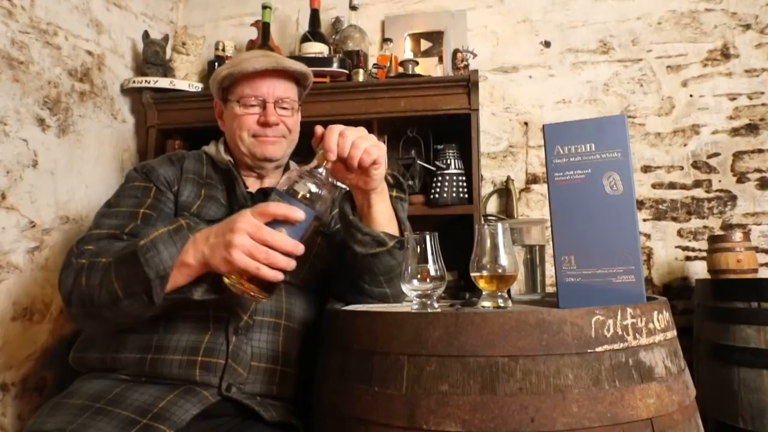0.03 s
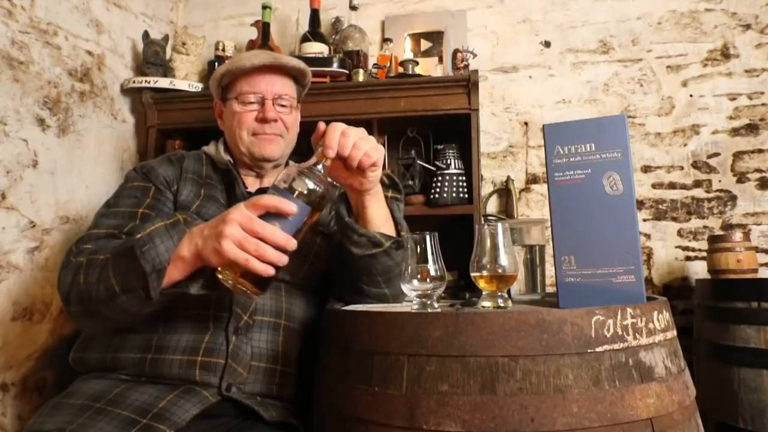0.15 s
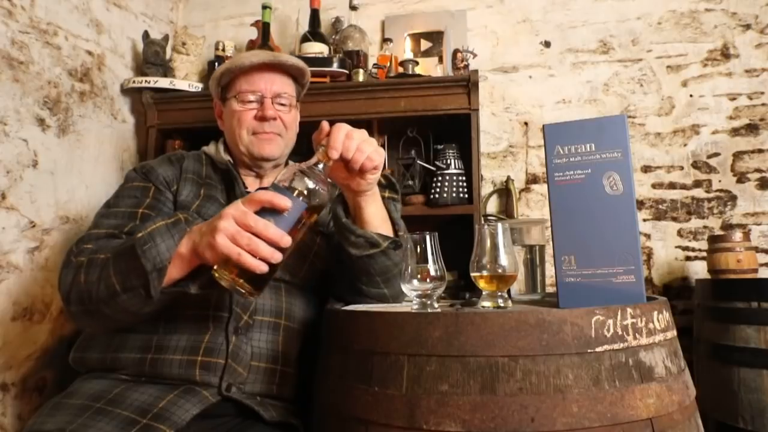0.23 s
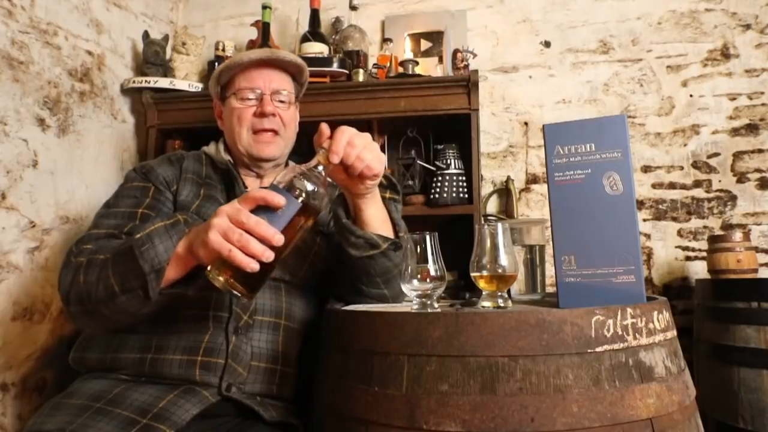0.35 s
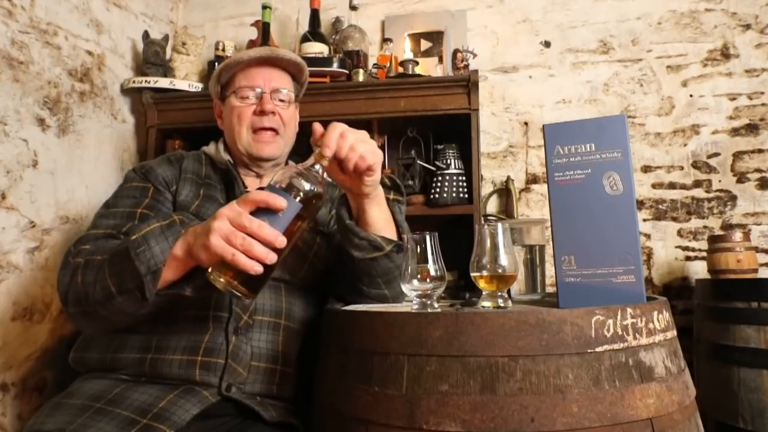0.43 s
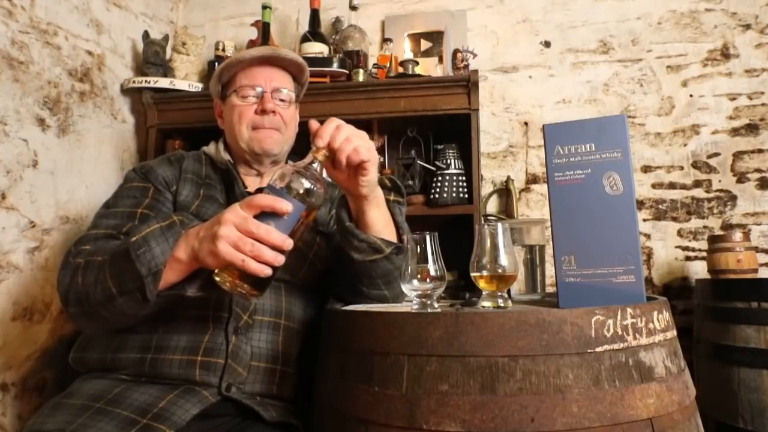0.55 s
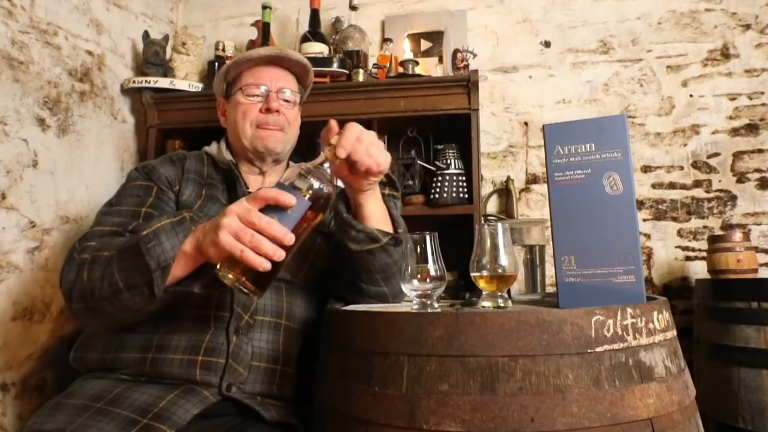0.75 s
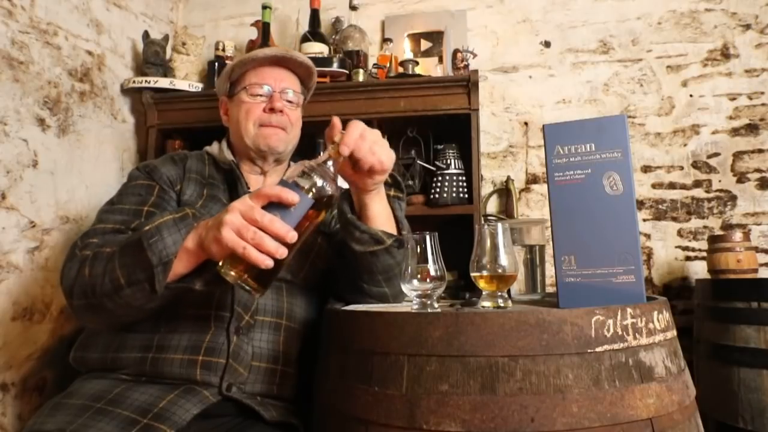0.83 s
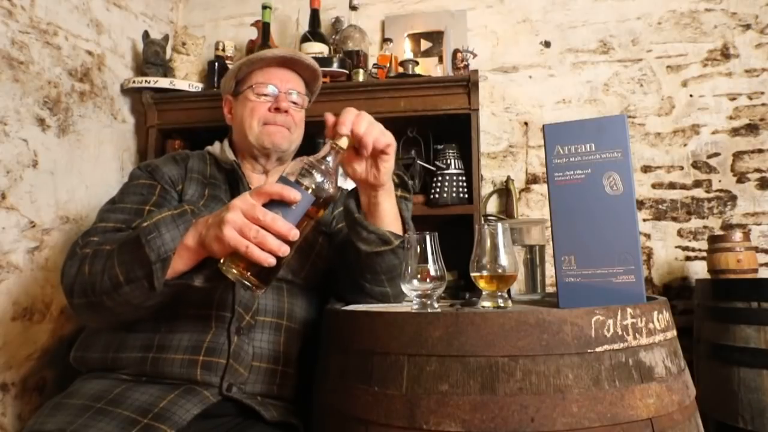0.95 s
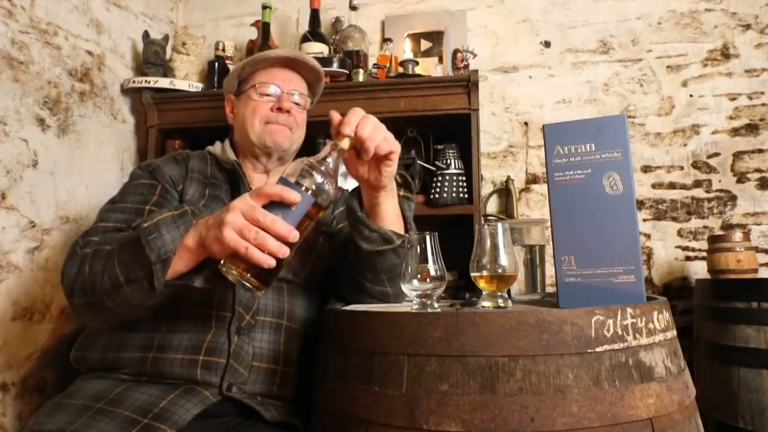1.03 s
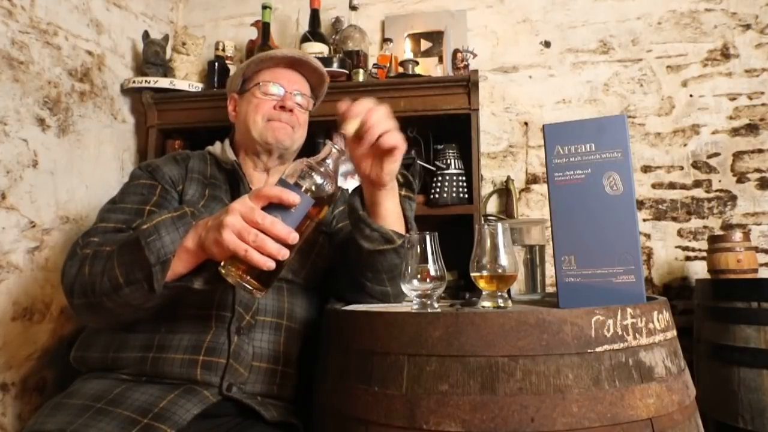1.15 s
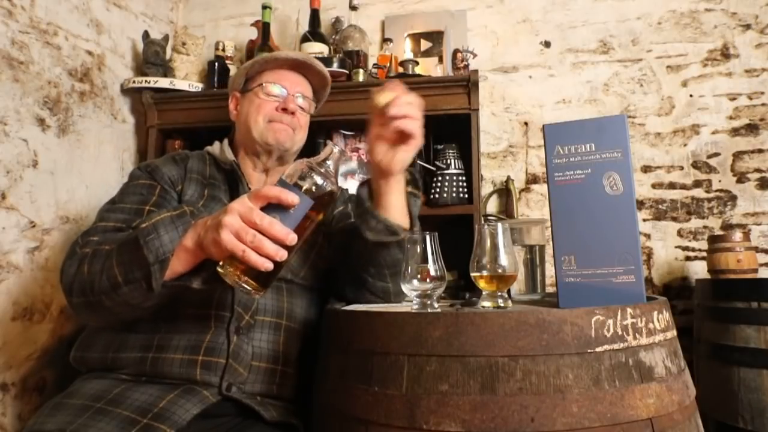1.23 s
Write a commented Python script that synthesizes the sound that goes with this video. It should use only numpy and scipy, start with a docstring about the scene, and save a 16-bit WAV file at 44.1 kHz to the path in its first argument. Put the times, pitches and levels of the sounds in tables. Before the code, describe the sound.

Close microphone in a small, lightly echoing room: dry rubbing squeaks of a cork twisted in glass, each slowing or breaking into creaks and clicks, then a rising squeal as it comes free with a soft pop.

```python
"""Squeaks and creaks of a cork twisted out of a glass bottle in four short turns, then a faint pop.
The cork sticks and slips on the glass: each slip is a kick; fast slips squeal, slow ones creak.
The last turn shoots up in pitch, the cork comes free and the air in the neck rings and puffs.
The fading tail of an earlier squeak, with a faint rub in it, is heard first, as coloured noise.
Lone snaps, the echo of a small stone room, soft noise and a low hum are added."""
import sys
import numpy as np
from scipy import signal
from scipy.fft import rfft, irfft
from scipy.io import wavfile

SR = 44100
rng = np.random.default_rng(int(sys.argv[2]) if len(sys.argv) > 2 else 0)


def master(y):
    """Save y as 16-bit WAV."""
    cut = np.clip(np.atleast_2d(y).T, -1, 1)
    pcm = np.round(cut * 32767)  # scale
    wavfile.write(sys.argv[1], SR, pcm.astype(np.int16))


N = 57330
T = np.arange(N) / SR   # time of each sample, s
SIZE = 2 ** 17   # samples in each Fourier transform
HZ = np.arange(SIZE // 2 + 1) * SR / SIZE   # frequency of each Fourier bin

# When the cork shifts its seat in each of the first three turns: (t/s)
SHIFT_TIMES = [0.234, 0.5, 0.746]


def from_db(db):
    """Turn decibels into a gain."""
    return 10 ** (np.asarray(db) / 20)


def rms_one(x):
    """Scale a sound to unit power."""
    return x / np.sqrt(np.mean(x ** 2) + 1e-20)


def at_hz(points, hz):
    """Read a table at any frequency, along a logarithmic frequency axis."""
    f, v = np.transpose(points)
    return np.interp(np.log(np.maximum(hz, 1)), np.log(f), v)


def colour(x, spectrum):
    """Filter with the given spectrum, never sounding ahead of its input (minimum phase)."""
    cepstrum = irfft(np.log(from_db(at_hz(spectrum, HZ))))
    # Folding the second half onto the first makes the filter minimum-phase.
    cepstrum[1:SIZE // 2] *= 2
    cepstrum[SIZE // 2 + 1:] = 0
    response = np.exp(rfft(cepstrum))
    return irfft(rfft(x, SIZE) * response)[:N]


def clicks(times, sizes):
    """Make very short impulses, placed between samples by windowed sinc curves."""
    out, taps = np.zeros(N), np.arange(-8, 9)
    at = np.asarray(times)[:, None] * SR
    index = at.astype(int) + taps
    offset = index - at
    shape = np.sinc(offset) * np.sinc(offset / len(taps) * 2)
    np.add.at(out, np.clip(index, 0, N - 1), np.asarray(sizes)[:, None] * shape)
    return out


def earlier_tail():
    """The fading tail of an earlier squeak, with a faint rub in it, made of coloured noise."""
    # Loudness of the tail, with the rub as a small rise: (t/s, level/dB)
    loudness = [(0, -41.5), (.035, -50), (.075, -46.5), (0.112, -55), (.2, -53.5)]
    # Tone of the tail: (f/Hz, level/dB)
    tail_spectrum = [(1200, -0.5), (2100, 7.5), (3350, 2.5), (4200, -3), (8000, -19.5)]
    s, db = np.transpose(loudness)
    fade = np.exp(-np.maximum(T - s[-1], 0) / 0.1)
    noise = rms_one(colour(rng.standard_normal(N), tail_spectrum))
    return from_db(np.interp(T, s, db)) * fade * noise


def background():
    """Room tone, a wavering low hum and a trace of noise that differs between the two sides."""
    # Spectrum shape of the room tone: (f/Hz, level/dB per Hz)
    floor_spectrum = [(50, -24), (85, 1), (130, -4.5), (400, -4.5), (1600, -15.5), (3000, -15),
                      (5000, -24.5), (16000, -27.5)]
    # The hum wavers: (t/s, level/dB)
    hum_level = [(0, -59), (.12, -54.5), (.2, -65), (.98, -68), (1.1, -58.5), (1.3, -62)]
    hum_hz = 47.6
    floor_db, side_hiss_db, side_tone_db = -53, -64.5, -75
    hum_gain = from_db(np.interp(T, *np.transpose(hum_level)))
    hum = hum_gain * np.sqrt(2) * np.sin(2 * np.pi * hum_hz * T)
    tone, other = (rms_one(colour(white, floor_spectrum)) for white in rng.standard_normal((2, N)))
    bright_hiss = rms_one(np.diff(rng.standard_normal(N + 1)))
    side = from_db(side_hiss_db) * bright_hiss + from_db(side_tone_db) * other
    # The side noise has opposite signs in the two channels.
    return from_db(floor_db) * tone + hum + side * np.array([[1], [-1]])


def smear(x):
    """Cork and glass answer each kick with a short ring (all-pass), and radiate little bass."""
    # Bands that the neck holds back a little: (f/Hz)
    lag_hz = [1920, 3700, 5110, 6700]
    lag_width_hz, low_cut_hz = 470, 270
    r = np.exp(-np.pi * lag_width_hz / SR)
    for hz in lag_hz:
        a = [1, -2 * r * np.cos(2 * np.pi * hz / SR), r * r]
        x = signal.lfilter(a[::-1], a, x + 1e-18)
    return signal.sosfilt(signal.butter(2, low_cut_hz, "high", fs=SR, output="sos"), x)


def snaps():
    """Lone slips of the cork: a kick and a brief crumble of noise into the cork."""
    # Single snaps: (t/s, peak level/dB, dullness 0-1)
    snap_list = [(0.202, -36, 0.3), (0.3885, -26.5, 0), (0.3919, -16.5, 0.13), (0.413, -23, 0.8),
                 (0.8191, -13, 0.53), (.9368, -11.5, 0.33)]
    # What the snaps ring with: (f/Hz, level/dB)
    snap_spectrum = [(900, -27.5), (2000, -14), (2800, -2), (4100, -3.5), (4800, -14), (8500, -12.5),
                     (16000, -16)]
    crumble_fade_s, crumble_gain = .0014, .2
    out = np.zeros(N)
    for s, db, dull in snap_list:
        crumble = (T > s) * np.exp(-np.abs(T - s) / crumble_fade_s) * rng.standard_normal(N)
        kick = clicks([s], [1])
        snap = smear(colour(kick + crumble_gain * crumble, snap_spectrum))
        # A duller snap loses more treble.
        cutoff_hz = 16000 * .1 ** np.clip(dull, 0, 1)
        snap = signal.sosfilt(signal.butter(2, cutoff_hz, fs=SR, output="sos"), snap)
        out += from_db(db) * snap / np.abs(snap).max()
    return out


def waver(x):
    """As the contact creeps, overlapping bands of the ring swell and sink on their own."""
    swell_db = 2.5 * np.sqrt(3)   # greatest swell; the deepest sink is 0.73 of it
    step_s = .012   # time between fresh random levels
    centres = np.geomspace(900, 12000, 12)   # Hz
    spectrum, out = rfft(x, SIZE), 0
    knots = np.arange(400) * step_s
    for share in np.eye(len(centres)):
        drift = np.interp(T, knots, rng.uniform(-0.73, 1, len(knots)))
        band = irfft(spectrum * np.interp(HZ, centres, share))[:N]
        out = out + band * from_db(swell_db * drift)
    return out


def slip_kicks(s, rate, db, rough):
    """Stick and slip: one kick per slip; roughness unsettles their timing and strength."""
    jitter, uneven_db = 0.1715, 6.5   # spread of log period and of kick level at full roughness
    chance = np.clip(rng.standard_normal((400, 2)), -2, 2)
    times, sizes, now = [], [], s[0]
    for timing, strength in chance:
        if now > s[-1]:
            break
        unrest = np.clip(np.interp(now, s, rough), 0, 1)
        period = np.exp(jitter * unrest * timing) / np.interp(now, s, rate)
        kick_db = np.interp(now, s, db) + uneven_db * unrest * strength
        times.append(now)
        # The square root of the period keeps power steady when the slip rate changes.
        sizes.append(np.sqrt(period) * from_db(kick_db))
        now += period
    return clicks(times, sizes)


def squeak(turn, bodies):
    """Slips and their friction hiss shake the cork and neck, which ring in their own colours."""
    treble_hz, friction_db = 3170, -34
    hiss_fade_s = 0.0012   # time constant of the hiss power after each slip
    s, rate, db, treble_db, rough = np.transpose(turn)
    kicks = slip_kicks(s, rate, db, rough)
    follower = [1, -np.exp(-1 / (hiss_fade_s * SR))]
    hiss_power = signal.lfilter([1 / (hiss_fade_s * SR)], follower, kicks ** 2 + 1e-18)
    hiss = np.sqrt(np.abs(hiss_power)) * rng.standard_normal(N)
    force = kicks + from_db(friction_db) * hiss
    sound = waver(smear(sum(colour(force * share, body) for body, share in bodies)))
    # Turn the treble up and down through the turn.
    bass = signal.sosfiltfilt(signal.butter(2, treble_hz, fs=SR, output="sos"), sound)
    sound = bass + (sound - bass) * from_db(np.interp(T, s, treble_db))
    # Give the whole turn the power that its level table asks for.
    level = from_db(np.interp(T, s, db)) * (T >= s[0]) * (T <= s[-1])
    return rms_one(sound) * np.sqrt(np.mean(level ** 2))


def shifting_squeak(turn, early_body, late_body, shift_s):
    """A squeal whose ring gives way to another as the cork shifts its seat."""
    blend_s = .01
    share = .5 + .5 * np.tanh((T - shift_s) / blend_s)
    return squeak(turn, [(early_body, 1 - share), (late_body, share)])


def first_turn():
    """The first squeal: its slips slow into a creak as the cork sticks for longer."""
    # Course of the turn: (t/s, slip rate/Hz, level/dB, treble/dB, roughness 0-1)
    course = [(.212, 800, -41.5, 6, 0.07), (.224, 813, -30, 3.5, 0.01), (.236, 760, -27.5, 4.5, 0.04),
              (.25, 678, -25, -5.5, 0.05), (.272, 693, -27, -3, 0.15), (.284, 602, -27.5, 0, 0.08),
              (.297, 495, -28.5, -10, 0.13), (.312, 517, -28, -5, 0.2), (.33, 655, -29.5, 11.5, .08),
              (.343, 593, -28, 6.5, 0.3), (.352, 390, -25.5, 3, 0.3), (.384, 220, -40, 13, 0.7)]
    # Ring of cork and neck before and after the shift: (f/Hz, level/dB)
    early_body = [(800, -20.5), (1600, 2), (2400, -3), (3250, -11.5), (4100, -31.5), (16000, -48)]
    late_body = [(300, -14.5), (950, -18), (1350, -6.5), (1700, -3.5), (2020, 4.5), (2400, -5.5),
                 (3300, -17.5), (4500, -24.5), (5200, -16), (6000, -29.5), (16000, -53)]
    return shifting_squeak(course, early_body, late_body, SHIFT_TIMES[0])


def pop():
    """Jerks of the cork set the bottle's air ringing; the neck opens with a soft tick and a puff."""
    # Thumps as the cork jerks and as it comes free: (t/s, level/dB)
    thumps = [(.385, -10.5), (0.954, -8)]
    # Ringing air, to which each thump adds its dB: (f/Hz, level/dB, time to fade by 60 dB/s)
    air_modes = [(207.9, -46.5, 0.31), (239.4, -38.5, 0.29)]
    thump_rise_s, pop_s = 0.0023, .9555
    puff_hz, puff_db, puff_fade_s = 117, -46, .016
    tick_hz, tick_db, tick_fade_s = 800, -44, 0.0003
    air = 0
    for s, thump_db in thumps:
        age = np.maximum(T - s, 0)
        ring = sum(from_db(db - 60 * age / t60) * np.sin(2 * np.pi * hz * age)
                   for hz, db, t60 in air_modes)
        air = air + from_db(thump_db) * (1 - np.exp(-age / thump_rise_s)) * ring
    age = np.maximum(T - pop_s, 0)
    puff = from_db(puff_db) * np.exp(-age / puff_fade_s) * np.sin(2 * np.pi * puff_hz * age)
    tick = from_db(tick_db) * np.exp(-age / tick_fade_s) * np.sin(2 * np.pi * tick_hz * age)
    return air + puff + tick


def second_turn():
    """The second squeal: quick slips whose rate falls unevenly."""
    # Course of the turn: (t/s, slip rate/Hz, level/dB, treble/dB, roughness 0-1)
    course = [(.4612, 963, -23.5, -10, 0.077), (.469, 944, -21, -4, 0.1), (.484, 936, -22.5, 1, 0.044),
              (.494, 868, -24.5, 2, 0.07), (.506, 766.6, -21.5, -5, 0.09), (.528, 814, -25.5, 3, 0.057),
              (.55, 718.6, -23.5, -2.5, 0.16), (.566, 784, -27.5, -0.5, 0.087), (.576, 738, -23, -1.5, .35)]
    # Ring of cork and neck before and after the shift: (f/Hz, level/dB)
    early_body = [(400, -33), (1000, -14.5), (1850, 0.5), (2800, -3), (3750, 1.5), (4800, -6), (6600, -7.5),
                  (8400, -21.5), (16000, -58)]
    late_body = [(400, -20.5), (1100, -12.5), (1650, -2), (3200, -2.5), (4100, -4.5), (4800, -3.5),
                 (6000, -13), (7000, -16), (16000, -42)]
    return shifting_squeak(course, early_body, late_body, SHIFT_TIMES[1])


def third_turn():
    """The third squeal rises and falls while a set of slower slips creaks over its end."""
    # Squeal and creak: (t/s, slip rate/Hz, level/dB, treble/dB, roughness 0-1)
    squeal_course = [(.711, 996, -22, -5, 0.028), (.721, 1079, -17, -0.5, 0.019),
                     (.731, 1154, -22, 5, 0.018), (.749, 1172, -20.5, 10.5, 0.013),
                     (.758, 1136, -15, 2, 0.029), (.765, 986, -17, 3, 0.06), (.775, 610, -21, 5.5, .17),
                     (.79, 500, -31, 4, 0.45)]
    creak_course = [(.7653, 303.7, -23.5, -3, 0.045), (.7725, 296.4, -17.5, -1, .05),
                    (.776, 414.3, -22.5, 3, .2), (.7875, 420.3, -26, -2, 0.15), (.79, 310, -17, 0, .06),
                    (.794, 306.5, -20, 5.5, 0.095), (.805, 279.2, -23.5, 2.5, 0.11),
                    (.8125, 194, -28.5, 9, .1)]
    # Ring of cork and neck before the shift, then after it and in the creak: (f/Hz, level/dB)
    squeal_body = [(500, -36), (1080, -5.5), (2200, 3), (3400, -5.5), (4600, -9.5), (5800, -17),
                   (7000, -20), (8100, -13), (10200, -20), (13000, -41.5)]
    creak_body = [(400, -28.5), (1150, -7.5), (1500, -10), (2200, -0.5), (2800, -10.5), (3600, -3),
                  (4650, -3.5), (5200, -8.5), (7000, -12.5), (8200, -26.5), (16000, -47)]
    squeal = shifting_squeak(squeal_course, squeal_body, creak_body, SHIFT_TIMES[2])
    return squeal + squeak(creak_course, [(creak_body, 1)])


def last_turn():
    """Slips speed up into a high squeal, joined by slips of the cork's edge leaving the glass."""
    # Main slips and edge slips: (t/s, slip rate/Hz, level/dB, treble/dB, roughness 0-1)
    main_course = [(.9095, 1339, -28.5, 1.4, .1), (.915, 2003, -19.5, 7.9, 0.14),
                   (.921, 2374, -19.5, 8, 0.11), (.928, 2799, -16, 9, 0.057),
                   (.9335, 2895, -10.5, 8.2, 0.035), (.937, 3060, -18.5, 7.7, 0.12)]
    rim_course = [(.9315, 1444, -25.5, 13, 0.12), (.936, 2118, -15.5, -7, 0.084), (.940, 2299, -15, 2, 0.1),
                  (.945, 2486, -22.5, -1, 0.21)]
    # Ring of cork and neck: (f/Hz, level/dB)
    last_body = [(700, -26), (1500, -11.5), (2200, 5), (2900, 3), (3600, -0.5), (4700, 1.5), (5900, -9),
                 (6800, -15), (16000, -40)]
    return squeak(main_course, [(last_body, 1)]) + squeak(rim_course, [(last_body, 1)])


def room(x):
    """Direct sound, a near echo and a diffuse noise tail that fades at its own pace in each band."""
    # Time for the tail to fade by 60 dB: (f/Hz, time/s)
    fade_times = [(200, 0.29), (1000, 0.29), (2500, 0.33), (5000, 0.25), (9000, 0.2)]
    # Strength of the tail: (f/Hz, level/dB)
    tail_colour = [(200, -1.5), (1000, -2), (2500, -8.5), (5000, -8), (9000, -7), (16000, -12)]
    # Echo from a nearby surface: (delay/s, level/dB)
    echoes = [(0.01, -18.5)]
    tail_delay_s, build_s = 0.0024, 0.00099
    edges = np.r_[0, np.geomspace(250, 16000, 13)]   # band edges, Hz
    white = rfft(rng.standard_normal(N), SIZE)
    age, tail = np.maximum(T - tail_delay_s, 0), 0
    build = 1 - np.exp(-age / build_s)
    for low, high in zip(edges, edges[1:]):
        hz = (low + high) / 2
        noise = irfft(white * (HZ >= low) * (HZ < high))[:N]
        band = noise * from_db(-60 * age / at_hz(fade_times, hz)) * build
        width_gain = np.sqrt(2 * (high - low) / SR / N)   # wider bands carry more power
        tail = tail + rms_one(band) * width_gain * from_db(at_hz(tail_colour, hz))
    delay, db = np.transpose(echoes)
    reflections = tail + clicks(delay, from_db(db))
    return x + signal.fftconvolve(x, reflections)[:N]


def scene():
    """Cork and bottle, straight ahead, sound in the room; earlier tail and background join after."""
    cork = first_turn() + second_turn() + third_turn() + last_turn()
    return room(cork + snaps() + pop()) + earlier_tail() + background()


def record(dry):
    """Cut the very top of the treble with a steep low-pass filter."""
    cutoff_hz = 16100
    return signal.sosfilt(signal.ellip(10, .1, 80, cutoff_hz, fs=SR, output="sos"), dry)


dry = scene()
out = record(dry)
master(out)
```